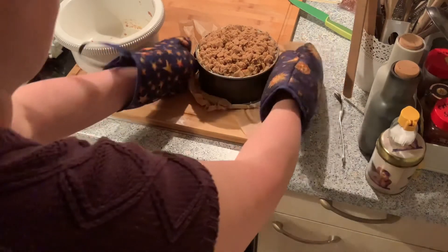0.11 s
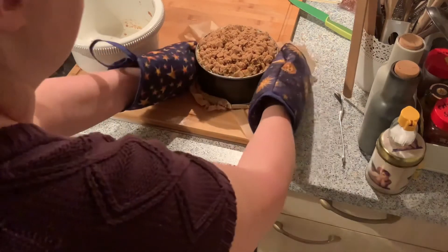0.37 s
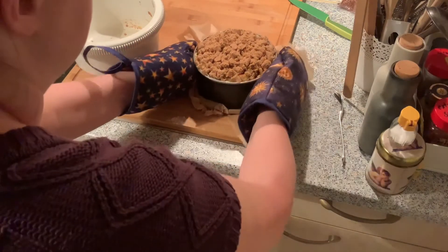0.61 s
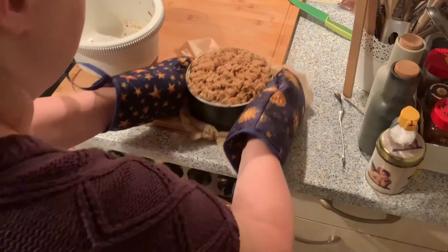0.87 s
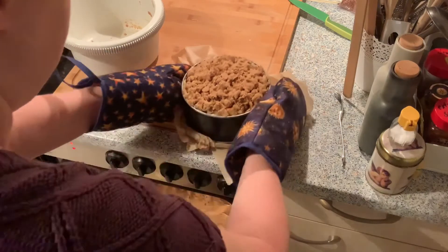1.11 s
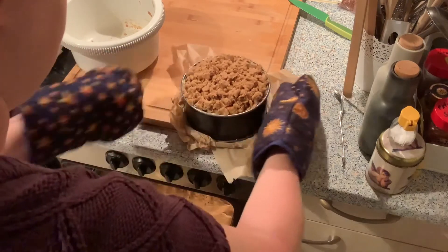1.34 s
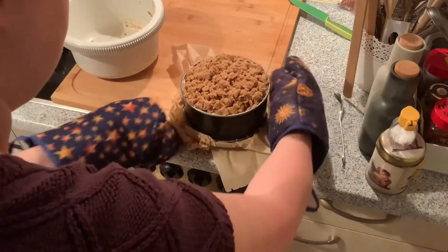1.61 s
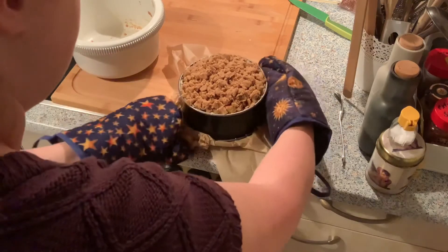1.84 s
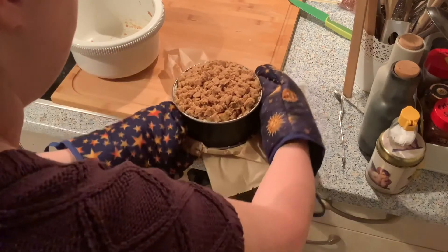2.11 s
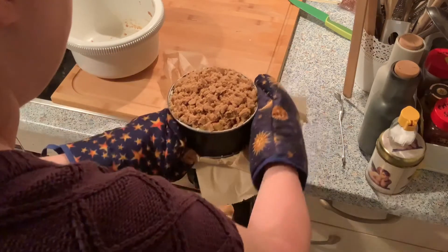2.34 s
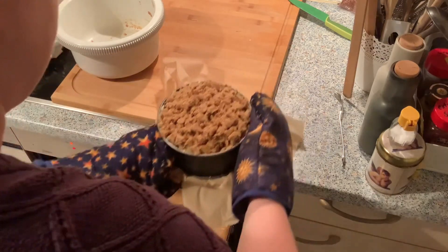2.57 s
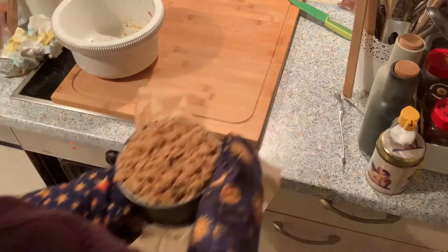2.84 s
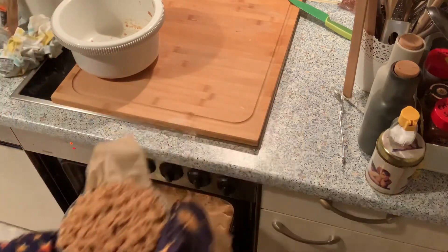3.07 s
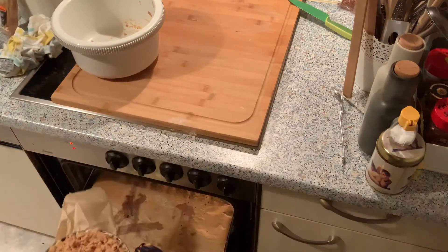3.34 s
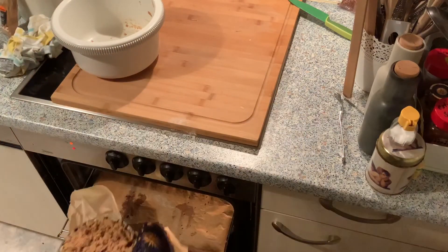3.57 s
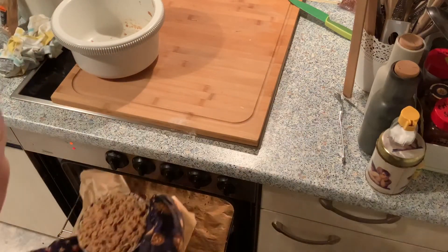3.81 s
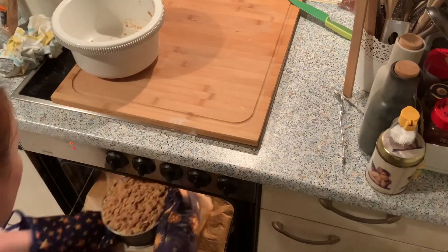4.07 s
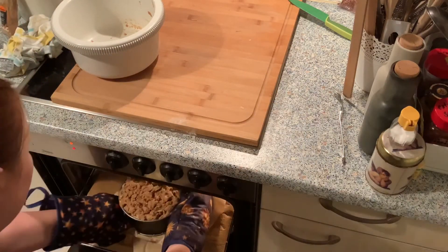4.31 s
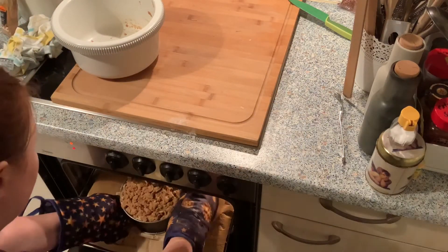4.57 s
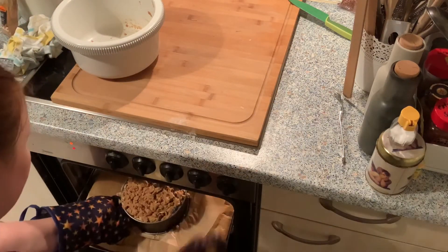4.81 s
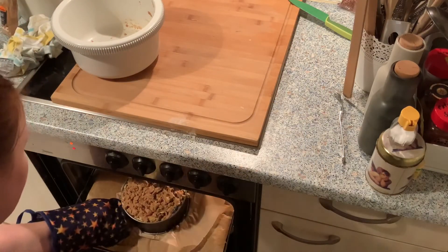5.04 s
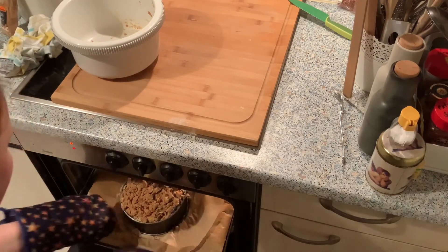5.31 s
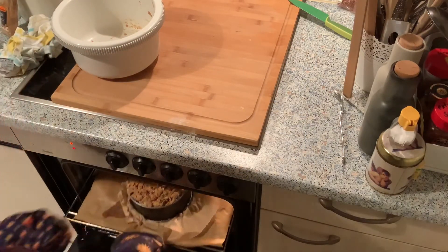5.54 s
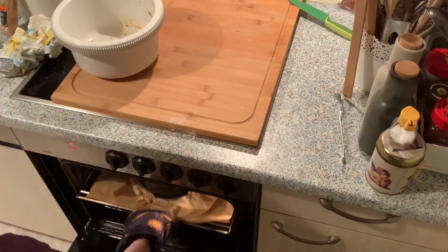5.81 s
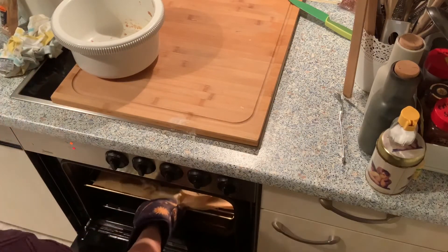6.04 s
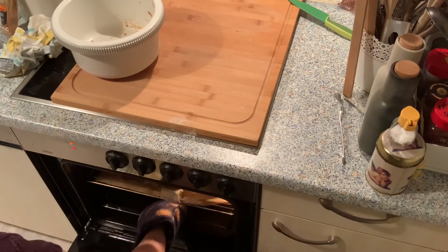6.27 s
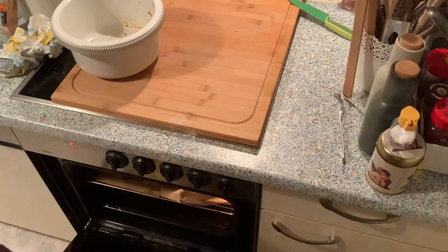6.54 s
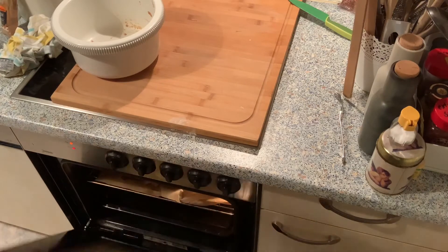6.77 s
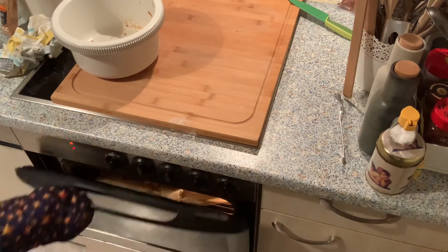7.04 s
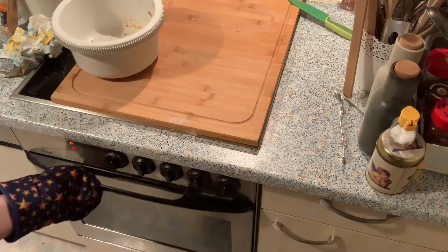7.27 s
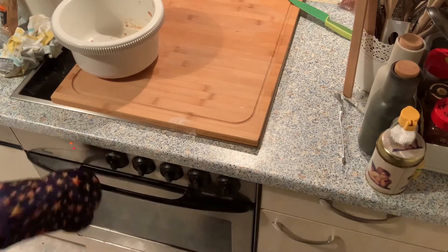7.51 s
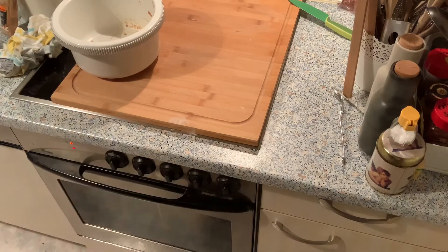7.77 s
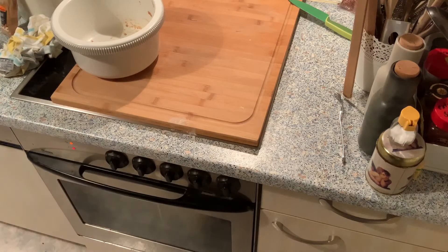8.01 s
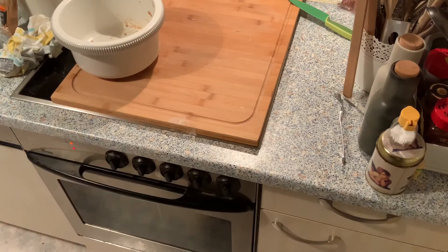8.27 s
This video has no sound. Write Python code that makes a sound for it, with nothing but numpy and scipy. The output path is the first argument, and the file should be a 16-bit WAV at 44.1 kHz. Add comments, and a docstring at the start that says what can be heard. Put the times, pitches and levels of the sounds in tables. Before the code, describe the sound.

In a small kitchen with a soft appliance hum, a pan slides over crinkling baking paper with sharp bright snaps. Handling quiets as it is carried, then dull metal clanks and crisp crackles mark it landing on an oven tray. The tray rumbles inward, and the door closes with two heavy thumps. Close microphone, centred sound.

```python
"""A small kitchen with a quiet room hum, one microphone near the hands, the same signal on both channels. Mitts
slide a cake pan on crinkling baking paper (creased noise and snaps), grip it and carry it, then set it on a
paper-lined steel tray that sings under its rim. The tray is pushed into the oven, whose cavity drones, and the
paper crushes. A soft treble of mitt rustle and background hiss remains, dipping after the door shuts in two
dull thumps (damped modes under a noisy clank); a faint thin spring ring follows."""
import sys
import numpy as np
from scipy import signal
from scipy.fft import rfft, irfft, next_fast_len
from scipy.io import wavfile
from scipy.ndimage import uniform_filter1d, map_coordinates

SR = 44100
rng = np.random.default_rng(int(sys.argv[2]) if len(sys.argv) > 2 else 0)


def gain_from_db(level_db):
    """Turn a decibel level (scalar or array-like) into a linear amplitude factor."""
    decades = np.asarray(level_db, float) / 20
    return 10 ** decades


def int16_out(signal):
    """Quantize to a 16-bit WAV file."""
    q = np.round(np.clip(np.atleast_2d(signal).T, -1, 1) * 32767)
    wavfile.write(sys.argv[1], SR, q.astype(np.int16))


N = 369866

# Room and microphone.
# Appliance murmur. Each row: frequency in Hz, relative level in dB per Hz.
MURMUR_SPECTRUM = [(21, -45), (35, -16.5), (97, -8.5), (151, -9.5), (359, -1.5), (413, -8.5), (593, -14),
                   (662, -16), (1130, -21), (1500, -30.5), (1950, -56), (3300, -120)]
# The microphone's own hiss. Each row: frequency in Hz, relative level in dB per Hz.
HISS_SPECTRUM = [(710, -28), (1200, -0.5), (1290, -14), (1500, -4), (4440, -14.5), (9320, -6),
                 (15600, -37.5)]
# Decay of the kitchen's answer. Each row: frequency in Hz, t60 in s.
KITCHEN_DECAY = [(100, 0.13), (500, 0.42), (2000, 0.13), (6000, 0.14), (15000, 0.091)]
# The microphone's response. Each row: frequency in Hz, gain in dB.
MICROPHONE_RESPONSE = [(20, -38), (32, -11), (45, -3), (15800, 1), (16000, -42), (17000, -66)]

# Oven, door and tray.
# Blows on the oven. Each row: start in s, clank level in dB, place (-1 panel to 1 cavity wall),
# weight as boom in dB re clank, ring-time factor.
OVEN_BLOWS = [(4.302, -21.5, 0.18, -33, 1.6), (5.109, -20.5, -0.11, -28, 1.04),
              (5.303, -20.5, 0.92, -40, 1.6), (5.998, -42.5, -0.082, -16, 1.7),
              (6.857, -20, 0.34, -10, 1.66), (6.905, -25.5, 0.48, 0, .93),
              (7.228, -23, -0.076, -11.5, 1.27), (7.261, -27, -0.84, -4.5, 0.72),
              (7.433, -77, 0.61, 6, 1.04)]
# Modes of the door and the air in the room. Each row: Hz, relative level in dB, t60 in s at ring factor 1.
BOOM_MODES = [(53.3, 3.5, 0.31), (71, -14, 0.18), (45.3, -12, 0.24)]
# Modes of the oven cavity. Each row: Hz, relative level in dB, t60 in s at ring factor 1.
CAVITY_MODES = [(149.7, 5.5, 0.14), (119.3, -1, 0.15), (232, -11, 0.33)]
# Modes of the steel panels. Each row: Hz, relative level in dB, t60 in s at ring factor 1.
PANEL_MODES = [(371.6, 3.5, 0.23), (438, -3, 0.16), (476, -10, 0.41), (650, -23, 0.16)]
# Modes of the door's glass and steel. Each row: Hz, relative level in dB, t60 in s at ring factor 1.
DOOR_MODES = [(389.7, -1.5, 0.24), (430.5, -0.5, 0.24), (519, -13, 0.17), (635, -12, 0.18)]
# Clank of the tray. Each row: frequency in Hz, relative level in dB per Hz.
TRAY_CLANK_SPECTRUM = [(120, -28), (200, -2.5), (294, -15.5), (396, -12.5), (818, -19.5), (999, -11),
                       (1760, -24), (2450, -21), (2820, -27), (6000, -53), (7800, -68), (13200, -120)]
# Clank of the door. Each row: frequency in Hz, relative level in dB per Hz.
DOOR_CLANK_SPECTRUM = [(120, -35), (200, -9), (300, -13.5), (450, -6.5), (800, -10), (1200, -14),
                       (1800, -19), (2600, -21.5), (3400, -33), (6000, -58), (13200, -120)]
# Metal on metal. Each row: frequency in Hz, relative level in dB per Hz.
EDGE_SPECTRUM = [(600, -14), (1200, -2), (2200, -37), (3300, 0), (4500, -12.5), (9000, -17), (16000, -31)]
# The droning oven cavity. Each row: frequency in Hz, relative level in dB per Hz.
DRONE_SPECTRUM = [(47, -45), (80, -18.5), (113, -5.5), (151, 4.5), (166, 1), (188, -10.5), (227, 0.5),
                  (268, -11), (330, -11), (430, -62.5), (730, -120)]
# The rumbling floor. Each row: frequency in Hz, relative level in dB per Hz.
RUMBLE_SPECTRUM = [(21, -24), (35, -14), (54, 13), (72, 11), (95, 7), (120, -42), (210, -120)]
# Steel tray under the sliding pan. Each row: resonance in Hz, width in Hz, relative level in dB.
TRAY_RESONANCES = [(368.5, 8.7, 3.5), (540, 9.5, 4), (1174, 28, -8), (2330, 1800, -4)]
# The pan scraping steel. Each row: start in s, length in s, level in dB.
RIM_SLIPS = [(4.219, 0.12, -37), (4.477, 0.028, -34.5), (4.634, 0.016, -39), (4.8, 0.0085, -48),
             (4.984, 0.35, -39)]

# Hands, paper and pan.
# Creases snapping. Each row: start in s, level in dB, bright centre in Hz, body in dB re level, body in Hz.
CREASE_SNAPS = [(0.0356, -20, 14600, -26, 2340), (0.0693, -14.5, 15200, -26, 1750),
                (0.0996, -9, 14400, -13, 1270), (0.173, -20, 4640, -12, 2540),
                (0.198, -15, 7540, -16, 2400), (0.2394, -29, 13900, -18, 1550),
                (0.2608, -12, 12500, -13.5, 2170), (0.342, -25, 15200, -22, 2360),
                (0.3785, -26, 15300, -5.5, 2930), (0.395, -18.5, 14300, -18, 2380),
                (0.4444, -20.5, 10100, -14, 1430), (0.4771, -15, 12500, -17.5, 2460),
                (0.5046, -17, 14100, -12.5, 2340), (0.83, -11.5, 14000, -14.5, 1600),
                (0.906, -20.5, 11000, -9, 2030), (0.9424, -21.5, 14200, -10.5, 2580),
                (0.9607, -21, 5000, -8, 1830), (1.0241, -28.5, 4720, -20, 2330),
                (1.055, -19.5, 11200, -12.5, 1980), (1.1099, -21.5, 10900, -11.5, 2430),
                (1.1263, -18.5, 14700, -14, 2200), (1.143, -15.5, 7300, -18, 2830),
                (1.1972, -26, 5400, -16, 2760), (1.2426, -18.5, 14000, -16, 2340),
                (1.286, -8, 9200, -19.5, 2080), (1.3195, -23, 14300, -16, 1520),
                (1.354, -33, 5410, -17, 2890), (1.3872, -21, 7540, -20, 2320),
                (1.4193, -23, 14500, -27, 1740), (1.4593, -15.5, 12500, -14.5, 1200),
                (1.4815, -19.5, 14400, -11.5, 2310), (1.5195, -13, 10800, -27, 1680),
                (1.573, -9.5, 12400, -17.5, 2150), (1.6412, -15, 8890, -14, 3080),
                (1.6964, -22, 14900, -20, 2130), (1.7656, -33, 14400, -6, 3030),
                (1.7819, -14.5, 14900, -19.5, 2450), (1.854, -19, 14200, -18, 2440),
                (2.0014, -22, 12600, -11, 2080), (2.0143, -18.5, 13500, -14.5, 3080),
                (2.1141, -25, 14700, -31, 2420), (2.2114, -20.5, 14600, -10.5, 3430),
                (2.228, -19, 14800, -27, 3190), (2.3624, -27.5, 12700, -29, 1670),
                (2.4069, -28, 13500, -17, 1020), (2.4164, -17.5, 15200, -13.5, 2960),
                (2.4842, -18, 14100, -18.5, 3180), (2.5007, -18.5, 14800, -20, 2660),
                (2.6085, -34, 14800, -8.5, 1060), (2.7258, -29, 14500, -19, 2590),
                (2.8075, -47, 14300, -3, 1240), (2.8256, -34, 4960, -13.5, 1700),
                (2.8764, -37, 4780, -5.5, 1470), (2.9214, -33.5, 5100, -29, 2400),
                (3.0061, -50, 4700, -16, 1570), (3.0335, -36, 5720, -6.5, 2190),
                (3.0544, -35, 12500, -7, 2280), (3.087, -31.5, 4560, -18, 2240),
                (3.1612, -41, 12800, -27, 2540), (3.236, -38.5, 4700, -13, 2710),
                (3.3026, -45, 4660, 1.5, 2100), (3.3436, -30, 11400, -18, 1990),
                (3.3972, -41.5, 13700, -4.5, 3140), (3.5384, -51, 14500, 2, 3370),
                (3.7517, -47, 8870, -23, 3030), (3.7733, -39, 13700, -14, 2310),
                (3.8156, -31, 12100, -8, 2330), (3.9098, -31.5, 11300, -11, 2310),
                (3.9848, -43.5, 14900, -1.5, 1260), (4.15, -36, 6610, -6.5, 2360),
                (4.174, -27, 8060, -13, 2340), (4.1906, -25, 4150, -13, 2360),
                (4.2033, -21, 12700, -8.5, 2210), (4.2634, -21.5, 10600, -5, 2260),
                (4.2963, -11, 13500, -11, 2310), (4.3899, -18, 14000, -8.5, 1320),
                (4.4695, -10, 14400, -16.5, 2470), (4.5157, -16.5, 15200, -9.5, 2430),
                (4.669, -23, 8300, -17, 3490), (4.7466, -23, 8400, -14, 1570),
                (4.81, -33.5, 6070, -4.5, 2400), (4.8379, -34, 6460, -18, 2180),
                (4.9211, -30.5, 4510, -13, 1400), (4.938, -31, 13300, -18, 1960),
                (4.9601, -21, 15300, -18, 2300), (5.0112, -24, 4310, -20, 3440),
                (5.042, -31.5, 4460, -9, 2360), (5.08, -15, 15100, -11, 2360),
                (5.0977, -11.5, 11600, -13, 3360), (5.1238, -11.5, 14800, -14, 1920),
                (5.1466, -8.5, 14600, -15.5, 2080), (5.2913, -10.5, 13400, -14, 1390),
                (5.4276, -35.5, 4560, -2, 2400), (5.5185, -35.5, 5280, -1, 1180),
                (5.7673, -35, 4730, -16, 2030), (5.7866, -27.5, 7500, -32, 1320),
                (5.8375, -23.5, 14500, -11, 2580), (5.9886, -40.5, 5250, -3, 1270),
                (6.0581, -33, 5170, -13, 1580), (6.0826, -31, 8890, -19, 2460),
                (6.101, -15.5, 14500, -22, 2370), (6.2866, -45, 4270, -1.5, 2230)]
# Hands on paper and pan, one list a move (slide, grip, carry, set down, straighten, push in).
# Each row: time in s, speed as crinkle in dB, weight on the pan as drag in dB re crinkle.
HAND_MOVES = [
    [(0.0, -36.5, -6.5), (0.246, -38.5, -11.5), (0.266, -36, -6), (0.288, -41, -10), (0.492, -38, -12.5),
     (0.674, -31.5, -11), (0.754, -32.5, -11.5), (0.908, -34.5, -8.5), (1.0, -48, -18)],
    [(1.01, -48.5, -7), (1.12, -44.5, -8.5), (1.408, -45, -5.5), (1.62, -36.5, -5), (1.776, -42.5, -10),
     (2.05, -42, -6.5), (2.396, -44, -10.5), (2.532, -46, -9.5), (2.6, -50.5, -11)],
    [(2.61, -52.5, -9.5), (2.78, -59.5, -7), (3.128, -58, 1), (3.18, -61, -9), (3.708, -66.5, -1),
     (3.794, -58, -14), (3.806, -62, -1), (3.994, -56.5, -5.5), (4.14, -55, -7)],
    [(4.15, -49, 2), (4.23, -48, -0.5), (4.346, -31.5, -6), (4.4, -38.5, -7.5), (4.554, -41.5, -8),
     (4.678, -43.5, -4.5), (4.738, -58, -11), (4.756, -52, 2), (4.91, -71, -17.5)],
    [(4.92, -52.5, -1.5), (5.0, -46, -3), (5.07, -43, -10.5), (5.114, -33, -7), (5.17, -34, -3.5),
     (5.212, -34.5, -9.5), (5.334, -43, 5), (5.5, -58, 1)],
    [(5.51, -54, -5), (5.532, -61.5, 13.5), (5.646, -58.5, 1), (5.896, -56.5, 1), (5.962, -63, 0),
     (5.998, -68, 14), (6.048, -64, 0), (6.09, -48.5, -1)],
]
# Soft treble once the paper is gone: mitt rustle and background hiss together, dipping after the thumps. # Each
# row: time in s, level in dB.
SOFT_TREBLE = [(6.35, -69.5), (6.64, -65.5), (6.66, -69), (6.83, -72), (6.85, -62.5), (7.1, -75.5),
               (7.22, -84), (7.23, -66), (7.27, -92), (7.32, -72), (7.43, -61), (7.63, -74), (7.68, -68.5),
               (7.9, -60.5), (8.12, -70.5), (8.2, -63.5), (8.31, -70.5), (8.38, -61.5)]
# Crinkling paper. Each row: frequency in Hz, relative level in dB per Hz.
CRINKLE_SPECTRUM = [(1760, -34), (3000, -4.5), (4380, -5.5), (6110, -4.5), (7880, -5.5), (10200, -6),
                    (14400, -4), (15100, 2), (15600, -23.5)]
# Soft treble without paper: mitts and background hiss. Each row: frequency in Hz, relative level in dB per Hz.
SLEEVE_SPECTRUM = [(1470, -30), (2500, -29), (3000, -16), (3580, -4), (4180, -5), (13700, 4.5), (15700, -8)]
# Rubbing paper. Each row: frequency in Hz, relative level in dB per Hz.
RUB_SPECTRUM = [(470, -14.5), (800, -1.5), (891, -4), (947, -1.5), (999, -2), (1980, 1), (2390, 3),
                (3680, -9.5), (5000, -13), (6500, -18), (11000, -120)]
# The dragging pan. Each row: frequency in Hz, relative level in dB per Hz.
DRAG_SPECTRUM = [(160, -11.5), (280, -10), (328, -5.5), (371, -2.5), (481, -5), (571, 0), (946, -7),
                 (1200, -5.5), (1560, -10.5), (2640, -120)]

PAPER_GONE_S = 6.35  # the lined tray is inside the oven
CAVITY_DB, PANEL_DB, PLACE_DB = -17.5, -11, 14.5  # re clank; dB per unit of place


def unit(x):
    """Scale to rms 1."""
    return x / np.sqrt(np.mean(x ** 2) + 1e-20)


def along(points, hz):
    """Interpolate (Hz, value) points on a log frequency axis."""
    f, v = np.transpose(points)
    return np.interp(np.log(hz + 1), np.log(f + 1), v)


def coloured(x, spectrum):
    """Filter x through a spectrum of (Hz, dB) points."""
    m = next_fast_len(len(x) + 8192)
    gain = gain_from_db(along(spectrum, np.fft.rfftfreq(m, 1 / SR)))
    return irfft(rfft(x, m) * gain, m)[:len(x)]


def resonant(x, modes):
    """Filter x through (Hz, width Hz, dB) resonances of alternating sign."""
    m = next_fast_len(len(x) + 8192)
    f = np.fft.rfftfreq(m, 1 / SR)
    gain = 0
    for k, (hz, width, db) in enumerate(modes):
        gain = gain + (-1) ** k * gain_from_db(db) * 1j * f * width / (hz * hz - f * f + 1j * f * width)
    return irfft(rfft(x, m) * gain, m)[:len(x)]


def wobble(rate):
    """A smooth random curve, rate knots a second."""
    knots = rng.standard_normal(int(N * rate / SR) + 4)
    return map_coordinates(knots, [np.arange(N) * rate / SR])


def fade(t60, seconds):
    """An exponential decay."""
    return gain_from_db(-60 * np.arange(int(seconds * SR)) / SR / max(t60, .002))


def stroke(start, end, db, rise_db_per_s, fall_db_per_s):
    """A gain that climbs to db at start, holds to end and falls away."""
    t = np.arange(N) / SR
    before, after = np.maximum(start - t, 0), np.maximum(t - end, 0)
    return gain_from_db(db - rise_db_per_s * before - fall_db_per_s * after)


def crackle(rate, spread_db, t60, bed_db):
    """Noise made of tiny creases: many small, few big, each dying fast, on a smooth bed."""
    chance, size = rng.random((2, N))
    kicks = (chance < rate / SR) * gain_from_db(-spread_db * np.log(size + 0.042))
    shape = unit(signal.fftconvolve(kicks, fade(t60, .08))[:N])
    return (shape + gain_from_db(bed_db)) / (1 + gain_from_db(bed_db)) * rng.standard_normal(N)


def patches(x, depth_db):
    """Different folds of the sheet speak in turn: random gain over pitch and time."""
    z = signal.stft(x, nperseg=512)[2]
    field = uniform_filter1d(rng.standard_normal(z.shape), size=24, axis=0)
    field = uniform_filter1d(field, size=10, axis=1)
    return signal.istft(z * gain_from_db(depth_db * unit(field)), nperseg=512)[1][:N]


def ring(modes, factor, rise, shake):
    """Damped modes that take a moment to swell; loose parts shake their phase."""
    t = np.arange(SR) / SR
    drift = shake * np.cumsum(rng.standard_normal((len(modes), SR)), axis=1) / np.sqrt(SR)
    tones = np.zeros(SR)
    for (hz, db, t60), phase in zip(modes, drift):
        tones += gain_from_db(db - 60 * t / (t60 * factor)) * np.sin(2 * np.pi * hz * t + phase)
    return tones * (1 - np.exp(-t / rise))


def hum():
    """The steady murmur of appliances and the microphone's own hiss, both coloured noise."""
    murmur = gain_from_db(-65 + 1.3 * wobble(9.8)) * unit(coloured(rng.standard_normal(N), MURMUR_SPECTRUM))
    return murmur + gain_from_db(-78.0) * unit(coloured(rng.standard_normal(N), HISS_SPECTRUM))


def kitchen(x):
    """The walls answer with a noise tail in which each frequency dies at its own speed."""
    hz, t, z = signal.stft(rng.standard_normal(SR // 2), SR, nperseg=256)
    decay = gain_from_db(-60 * t / along(KITCHEN_DECAY, hz)[:, None])
    tail = signal.istft(z * decay, SR, nperseg=256)[1]
    delayed = np.pad(x, (200, 0))  # samples on the way to the walls
    return signal.fftconvolve(delayed, tail / np.linalg.norm(tail))[:N]


def drone_and_rumble(drag_db):
    """Cavity drone and floor rumble swell with the tray's run on its rails and after every blow."""
    drone = stroke(5.42, 6.12, -56, 150, 97)
    rumble = stroke(5.42, 6.12, -64.5, 100, 17)
    for s, db, place, weight_db, _ in OVEN_BLOWS:
        cavity_db = db + CAVITY_DB + PLACE_DB * place
        drone += stroke(s + 0.028, s + 0.025, cavity_db - 9.5, 900, 60 / .5)  # t60 0.5 s
        rumble += stroke(s + 0.044, s + 0.045, db + weight_db - 17, 600, 60 / 1.2)  # t60 1.2 s
    drone += gain_from_db(-60.5 + 0.19 * (drag_db + 60))  # with the air, following the drag a little
    rumble += gain_from_db(-74)  # the floor at rest
    drone *= gain_from_db(0.88 * wobble(7) + 1.5 * wobble(21))
    rumble *= gain_from_db(1.8 * wobble(6))
    return (drone * unit(coloured(rng.standard_normal(N), DRONE_SPECTRUM))
            + rumble * unit(coloured(rng.standard_normal(N), RUMBLE_SPECTRUM)))


def spring():
    """The door spring settles: noise through one narrow resonance, a faint thin ring."""
    start_s, db, t60 = 7.375, -63, 0.3
    thin = resonant(rng.standard_normal(int(.4 * SR)), [(3100, 120, 0)])
    ring_out = gain_from_db(db) * fade(t60, .4) * unit(thin)
    return np.pad(ring_out, (round(start_s * SR), N))[:N]


def oven():
    """Tray and door hit through rubber and paper: boom, cavity and panels ring over a dull clank."""
    body, tray_clank, door_clank, edge = np.zeros((4, N + SR))
    for s, db, place, weight_db, factor in OVEN_BLOWS:
        hit, door = slice(round(s * SR), round(s * SR) + SR), s > PAPER_GONE_S
        body[hit] += gain_from_db(db + weight_db + 9.5) * ring(BOOM_MODES, factor, rise=0.068, shake=2.8)
        cavity_db = db + CAVITY_DB + PLACE_DB * place
        body[hit] += gain_from_db(cavity_db) * ring(CAVITY_MODES, factor, rise=0.0078, shake=4.5)
        panel_db = db + PANEL_DB - PLACE_DB * place
        panels = DOOR_MODES if door else PANEL_MODES
        body[hit] += gain_from_db(panel_db) * ring(panels, factor, rise=0.026, shake=3.5)
        clank = door_clank if door else tray_clank
        decay = fade(0.31 * factor, 1) + 1.85 * fade(0.012, 1)
        clank[hit] += gain_from_db(db + 5.5) * decay * rng.standard_normal(SR)
        # heavy blows are duller; the door rattles its shelves harder and longer
        edge_db = db - 23.5 - 0.47 * weight_db + door * 3
        edge_t60 = (0.13 if door else 0.082) * factor
        edge[hit] += gain_from_db(edge_db) * fade(edge_t60, 1) * rng.standard_normal(SR)
    rattle = gain_from_db(0.73 * wobble(90))  # loose shelves chatter
    clanks = coloured(rattle * tray_clank[:N], TRAY_CLANK_SPECTRUM)
    clanks += coloured(rattle * door_clank[:N], DOOR_CLANK_SPECTRUM)
    clanks += coloured(rattle * edge[:N], EDGE_SPECTRUM)
    return body[:N], clanks


def scrape():
    """Short slips of the pan's rim make the tray sing at its own resonances."""
    level = np.zeros(N)
    for s, length, db in RIM_SLIPS:
        level += stroke(s, s + length, db, rise_db_per_s=309, fall_db_per_s=227)  # grip, let go
    return level * unit(resonant(crackle(260, spread_db=9.5, t60=0.041, bed_db=-11), TRAY_RESONANCES))


def snaps():
    """A crease buckles in a few milliseconds, bright on top with a papery body; the worktop echoes it."""
    top, body, t = np.zeros(N + SR), np.zeros(N + SR), np.arange(SR // 5) / SR
    for s, db, top_hz, body_db, body_hz in CREASE_SNAPS:
        top_noise, body_noise, fibre_noise = rng.standard_normal((3, len(t)))
        length_s = 0.0041 * np.exp(0.2 * rng.standard_normal())  # median, log scatter
        u = t / max(length_s, .001)
        fibres = gain_from_db(7.94 * np.clip(fibre_noise, -3, 2.2) - 8)  # single fibres give way as sharp spikes
        onset = 1 - np.exp(-2.5 * u)
        buckle = onset * fibres * np.exp(-u ** 2)
        echo = onset * gain_from_db(-14.0) * fade(0.28, .2)
        fold = [(top_hz, 1.62 * top_hz, 0)]  # the size of the fold sets a broad colour
        bright = 0.065 * top_noise + 1.137 * resonant(resonant(top_noise, fold), fold)
        knock = 0.82 * resonant(buckle * body_noise, [(body_hz, 0.064 * body_hz, 0)])
        papery = knock + (0.34 * buckle + 0.98 * echo) * body_noise
        at = round(s * SR)
        top[at:][:len(t)] += gain_from_db(db + 0.5) * (buckle + echo) * bright
        body[at:][:len(t)] += gain_from_db(db + body_db + 13.5) * papery
    return coloured(top[:N], CRINKLE_SPECTRUM) + coloured(body[:N], RUB_SPECTRUM)


def hand_motion():
    """Speed (crinkle dB) and weight (drag dB re crinkle) of the hands, then the soft treble of mitts and hiss."""
    mitts = [(s, db, -4.5) for s, db in SOFT_TREBLE]  # empty mitts drag little
    s, speed, weight = np.vstack([*HAND_MOVES, mitts]).T
    t = np.arange(N) / SR
    moving, weight_db = gain_from_db(np.interp(t, s, speed)), np.interp(t, s, weight)
    # the paper crushes against the back wall, with a weight of its own
    crush = stroke(6.1, 6.13, -38, 3000, 216)
    weight_db = (moving * weight_db + crush * -9.5) / (moving + crush)
    return 20 * np.log10(moving + crush), weight_db


def handling(crinkle_db, weight_db):
    """Paper, cloth and pan move together: speed sets the crinkle, weight shifts it towards rub and drag."""
    papered = np.arange(N) < PAPER_GONE_S * SR
    rub_db, drag_db = crinkle_db + 0.5 + 0.74 * weight_db, crinkle_db + weight_db
    # creasing 0-1: fast slides are smoother, and the pan glides flat over the board for a while
    glide = stroke(.53, .92, 0, 100, 86)
    crumple = np.clip(0.52 - 0.17 * (crinkle_db + 37) - .6 * glide, 0, 1)
    crumple = np.where(papered, crumple, 0.35)  # wool has no creases, only a soft grain
    # broad clicks shared by treble and middle
    creases = crackle(500, spread_db=6.0, t60=0.031, bed_db=17.0 - 17.4 * crumple)
    creases = patches(creases, depth_db=2.12)
    flutter = 2.06 * crumple * wobble(25)  # dB
    paper, wool = unit(coloured(creases, CRINKLE_SPECTRUM)), unit(coloured(creases, SLEEVE_SPECTRUM))
    crinkle = gain_from_db(crinkle_db + flutter) * np.where(papered, paper, wool)
    smoothed = creases + 1.84 * rng.standard_normal(N)
    rub = gain_from_db(rub_db + 1.03 * flutter) * unit(coloured(smoothed, RUB_SPECTRUM))
    grain = crackle(210, spread_db=8.5, t60=0.058, bed_db=7)
    drag = gain_from_db(drag_db + 2.3 * wobble(11)) * unit(coloured(grain, DRAG_SPECTRUM))
    return crinkle + rub + drag


def scene():
    """Everything reaches one microphone; near sounds and clanks also come by way of the walls."""
    crinkle_db, weight_db = hand_motion()
    body, clank = oven()
    near = drone_and_rumble(crinkle_db + weight_db) + spring() + scrape() + snaps()
    near += handling(crinkle_db, weight_db)
    walls = kitchen(gain_from_db(-13.5) * near + gain_from_db(-10.5) * clank)
    mono = hum() + walls + body + clank + near
    return np.array([mono, mono])


def low_pass(x):
    """Removes everything above the highest recorded frequency."""
    return signal.sosfilt(signal.butter(12, 16800, fs=SR, output="sos"), x)


def record(dry):
    """The microphone drops the deepest bass and the highest treble."""
    mix = np.array([coloured(side, MICROPHONE_RESPONSE) for side in dry])
    return low_pass(mix)


dry = scene()
out = record(dry)
int16_out(out)
```